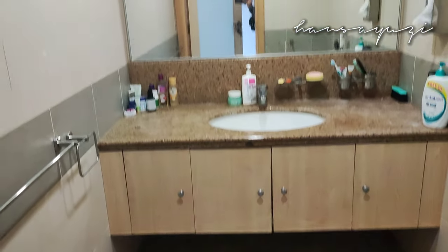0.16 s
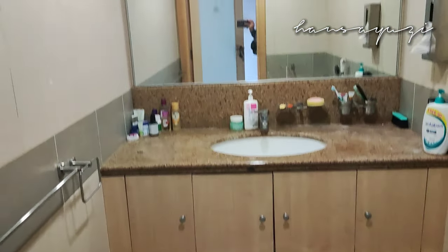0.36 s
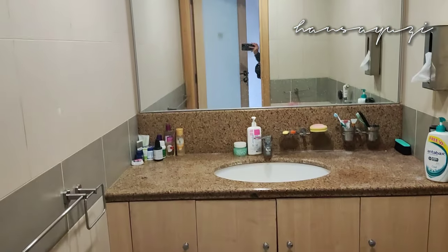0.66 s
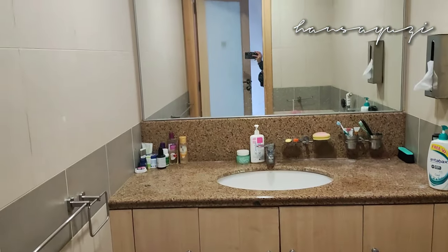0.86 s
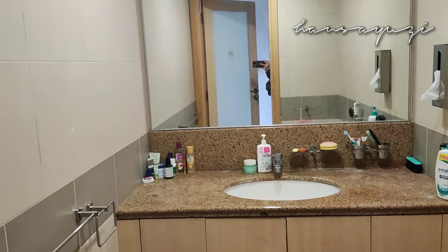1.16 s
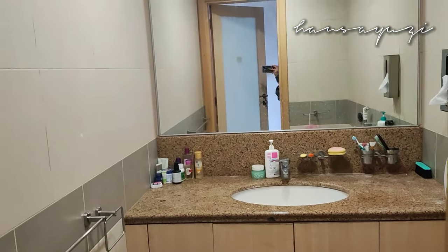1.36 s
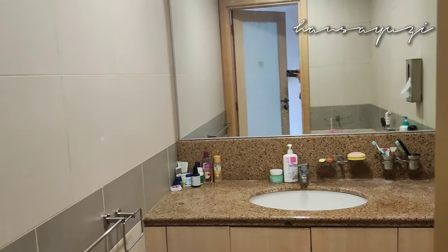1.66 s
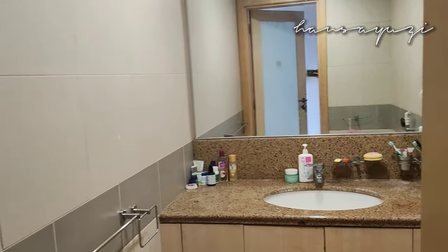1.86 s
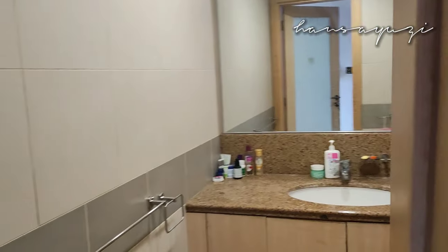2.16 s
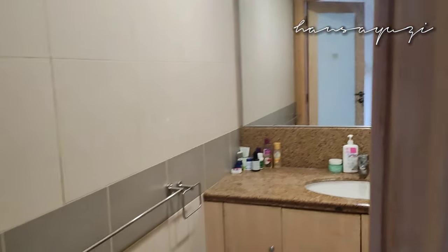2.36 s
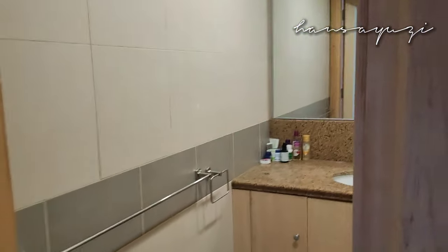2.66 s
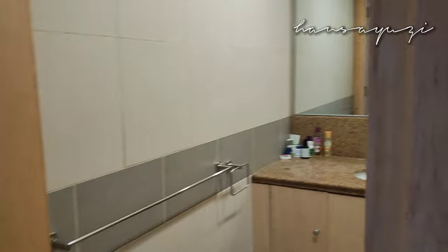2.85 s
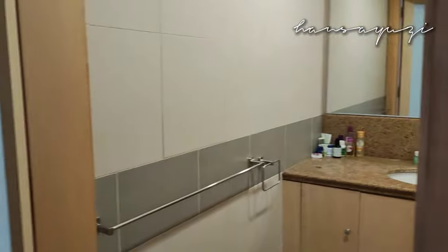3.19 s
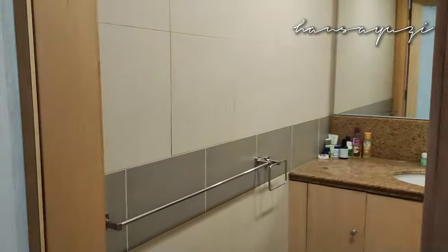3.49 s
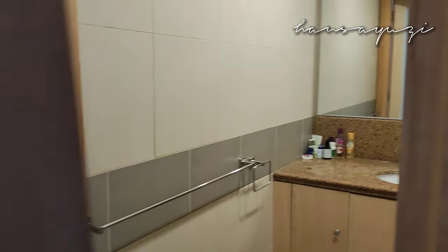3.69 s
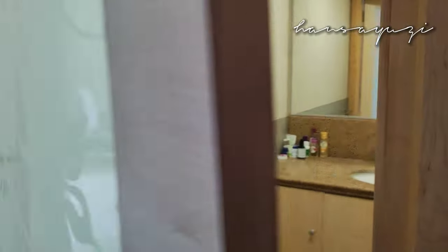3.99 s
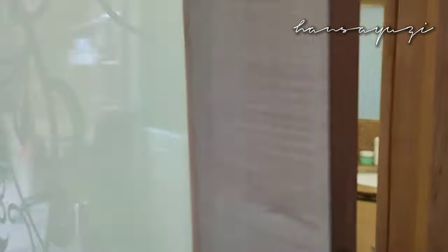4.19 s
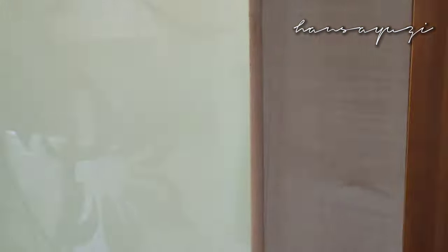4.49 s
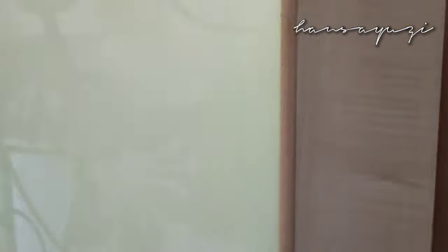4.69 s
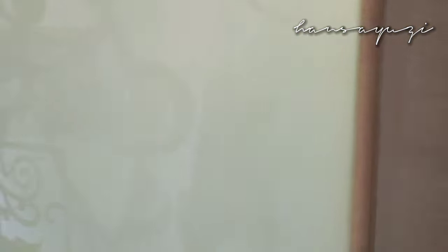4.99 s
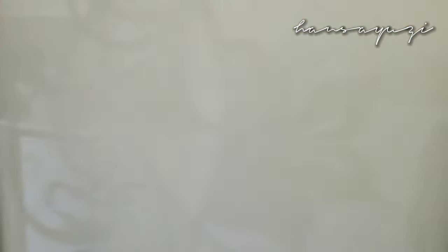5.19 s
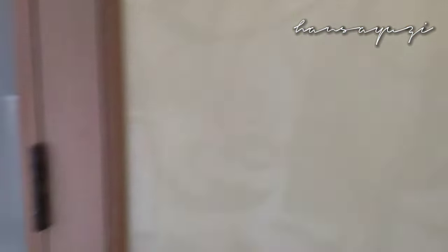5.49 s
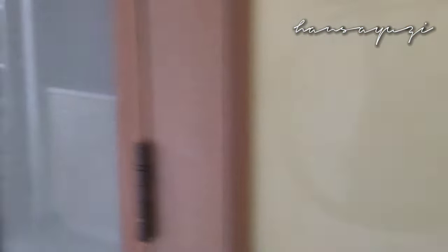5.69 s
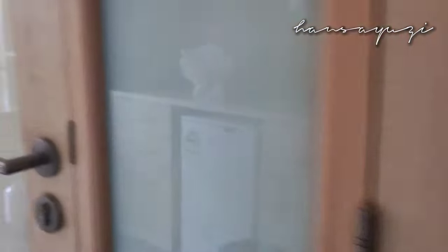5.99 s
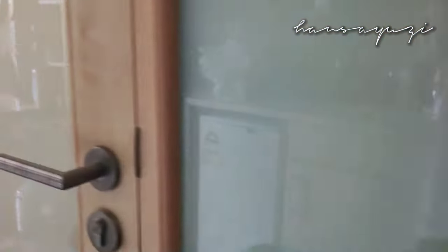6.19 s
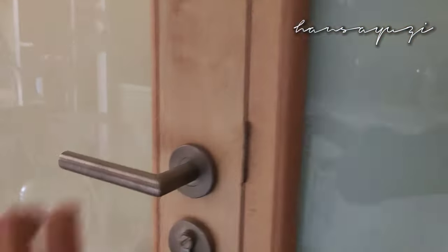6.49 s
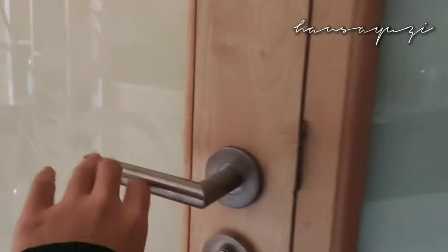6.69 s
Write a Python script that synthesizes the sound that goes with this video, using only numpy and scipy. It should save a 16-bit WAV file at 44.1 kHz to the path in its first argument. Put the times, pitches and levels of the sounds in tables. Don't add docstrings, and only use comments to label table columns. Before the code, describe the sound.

A quiet tiled bathroom heard through a handheld stereo phone. From 0 s there is low, slowly beating motor hum, soft rumble, faint hiss and a thin mid-pitched fan whine that swells and shifts sides. Cloth and slippers rustle very softly; a small sharp tick comes at 2.7 s, with more movement after it. Around 3.3 s a soft bump and a barely audible high metallic spring ring occur. Rustling grows from 4.2 s. At 4.76 s a latch snaps loudly with a woody knock; at 5.0 s the door slams, a rapid clatter of metal and hollow wood running to about 5.25 s, pane shuddering, deep air thumps beneath. A last small knock falls at 5.38 s. Hard walls ring on, fading by about 6 s. Soft footfalls, scuffs and short fabric rustles continue, with a light tap near 6.35 s, until 6.85 s.

```python
import sys
import numpy as np
from scipy import signal
from scipy.fft import rfft, irfft
from scipy.io import wavfile
from scipy.ndimage import uniform_filter1d

SR = 44100
rng = np.random.default_rng(int(sys.argv[2]) if len(sys.argv) > 2 else 0)


def volts_from_db(level):
    exponent = np.asarray(level, float) / 20
    return 10 ** exponent


def store_pcm(level_fs):
    pcm = np.round(np.clip(level_fs, -1, 1) * 32767).astype(np.int16)
    wavfile.write(sys.argv[1], SR, np.atleast_2d(pcm).T)


N = 302085
T = np.arange(N) / SR
BINS = np.maximum(np.fft.rfftfreq(N, 1 / SR), 1)


def unit(x):
    return x / np.sqrt(np.mean(x ** 2))


def along_hz(table, column=1):
    table = np.array(table, float)
    return np.interp(np.log(BINS), np.log(table[:, 0]), table[:, column])


def curves(table):
    s, *columns = np.transpose(table)
    return [np.interp(T, s, c) for c in columns]


def noise(colour):
    like = np.clip(along_hz(WALLS, column=2), 0, 1)
    mid, side = rfft(rng.standard_normal((2, N)))
    pair = np.sqrt(1 + like) * mid + np.sqrt(1 - like) * side * np.array([[1], [-1]])
    return unit(irfft(pair * volts_from_db(along_hz(colour)), N))


def narrow_noise(hz, width_hz):
    peak = 1 / (1 + ((BINS - hz) / (width_hz / 2)) ** 2)
    return unit(irfft(rfft(rng.standard_normal(N)) * peak, N))


def walk(rate_hz):
    k = int(SR / rate_hz)
    held = np.repeat(rng.standard_normal(N // k + 1), k)
    return 1.07 * uniform_filter1d(uniform_filter1d(held, k), k)[:N]


def pan(db):
    return volts_from_db(np.array([db, -db]) / 2)


def cut(x, hz, kind):
    return signal.sosfilt(signal.butter(2, hz, kind, fs=SR, output="sos"), x)


def port(x, peaks):
    for hz, width_hz, db in peaks:
        w, a = 2 * np.pi * hz / SR, volts_from_db(db / 2)
        d = np.sin(w) * width_hz / hz / 2
        zeros = [1 + d * a, -2 * np.cos(w), 1 - d * a]
        poles = [1 + d / a, -2 * np.cos(w), 1 - d / a]
        x = signal.lfilter(zeros, poles, x)
    return x


def contacts(events):
    crack, push = np.zeros((2, N)), np.zeros(N)
    for s, crack_db, push_db, ms, treble_db in events:
        i = int(s * SR)
        t = T[:min(N - i, SR // 4)]
        fade = np.exp(-t / (ms / 1000)) * np.clip(t / 0.0002, 0, 1)
        crack[:, i:i + len(fade)] += np.outer(volts_from_db(np.array([crack_db, crack_db + treble_db])), fade)
        push[i:i + len(fade)] += volts_from_db(push_db) * fade
    return crack, push


def swells(events, rise_db_s, fall_db_s):
    s, hold, *dbs = np.transpose(events)[:, :, None]
    t = T[::32]
    under_db = np.maximum(np.maximum((s - t) * rise_db_s, (t - s - hold) * fall_db_s), 0)
    return [np.interp(T, t, np.sqrt(np.sum(volts_from_db(2 * (db - under_db)), axis=0))) for db in dbs]


# start_s, metal_crack_db, wood_body_db, contact_ms, crack_treble_db
BLOWS = [(4.7606, -15, -28, 2.56, 12.5), (4.7629, -10.5, -11.5, 4.3, -3), (4.7662, -15, -26, 2, -15),
         (4.7845, -38, -20.5, 3, -4), (4.821, -38, -15.5, 6, -3), (4.987, -56, -24, 4.2, -14),
         (4.9928, -20.5, -36, 4.6, 0.5), (5.0064, -10, -46, 2.23, 9), (5.0086, -8.5, -19, 3, 8.5),
         (5.026, -15, -22.5, 2.3, -3), (5.040, -17, -20, 5.6, 8.5), (5.054, -18, -16.5, 4.1, 0),
         (5.083, -31, -18.5, 6.5, -8), (5.114, -23, -13.5, 5.1, -5), (5.134, -17.5, -17, 4.8, -3),
         (5.161, -26, -17.5, 4.6, 1), (5.188, -16.5, -18.5, 2.2, -2), (5.215, -23, -20, 1.1, -13),
         (5.2625, -23, -27.5, 3.1, -0.5), (5.3788, -29.5, -34.5, 2.6, -12)]
# start_s, hold_s, buzz_db, body_db
SHUDDER = [
    (5.012, 0.0043, -27.5, -30),
    (5.125, 0.069, -48, -30),
    (5.33, 0.17, -63, -45.5),
]
SHUDDER_RISE_DB_S, SHUDDER_FALL_DB_S = 510, 183
# pitch_hz, level_db, t60_s
LEAF = [(143.7, 3, 0.47), (155, 3, 0.51), (186.2, -2, 0.51), (209.3, 0, 0.94), (248, -1, 0.34),
        (289, -3, 0.39), (325.3, -1, 0.42), (386, -25, 0.86), (403, -13, 0.44), (460, -11, 0.35),
        (521, -11, 0.32), (582, -12.5, 0.48), (657, -4.5, 0.28), (809, -8.5, 0.31), (916, -16, .25),
        (1122, -10.5, 0.2), (2770, -9.5, 0.2), (3290, -25, 0.23)]
# pitch_hz, level_db (per Hz)
THUD = [(60, -21.5), (100, -36), (140, 12.5), (220, 9.5), (350, 5), (600, -0.5), (1200, -13), (3000, -22),
        (8000, -55)]


def door():
    crack, push = contacts(BLOWS)
    buzz, body = swells(SHUDDER, SHUDDER_RISE_DB_S, SHUDDER_FALL_DB_S)
    chatter = volts_from_db(1.8 * walk(120))
    rattle = volts_from_db(-24.5) * chatter * body * rng.standard_normal(N)
    force = np.diff(push, prepend=0).clip(0) + rattle
    t = T[:SR]
    ring = 0
    for hz, db, t60 in LEAF:
        ring = ring + volts_from_db(db) * np.sin(2 * np.pi * hz * t) * np.exp(-np.log(1000) * t / t60)
    modes = signal.fftconvolve(force, ring)[:N]
    thud = (push + body) * noise(THUD).mean(axis=0)
    return crack + chatter * buzz, volts_from_db(1.0) * thud, volts_from_db(-12) * modes


# pitch_hz, level_db (per Hz)
CRACK = [(300, -10), (700, 1), (1500, 1), (3500, -2), (6500, -9.5), (9000, -6.5), (11000, -20.5),
         (15000, -31), (16300, -34), (17000, -59)]
# pitch_hz, width_hz, level_db
LATCH = [(560, 58, 9), (657, 23, 4.5), (784, 235, 9), (1050, 61, -9.5), (1170, 72, 6.5), (1410, 130, -2.5),
         (2270, 230, 3), (2720, 240, 5), (3280, 100, -4.5), (3330, 160, 4.5), (4260, 230, 5)]
TREBLE_HZ, TREBLE_PAN_DB = 5340, 10


def latch(crack):
    metal = port(noise(CRACK), LATCH)
    metal = metal / np.sqrt(uniform_filter1d(metal ** 2, SR // 700))
    treble = cut(metal, TREBLE_HZ, "high") * pan(TREBLE_PAN_DB)[:, None]
    return crack[0] * cut(metal, TREBLE_HZ, "low") + crack[1] * treble


# pitch_hz, crest_s
AIR_MODES = [(13.5, 5.072), (23.7, 5.163), (44.2, 4.992)]
# start_s, hold_s, level_db
AIR = [
    [(5.03, 0.027, -23), (5.3, 0.55, -34.5)],
    [(4.7, 0.021, -25), (5.09, .04, -21), (5.165, .01, -16.5), (5.3, .01, -20), (5.5, 0.028, -29.5)],
    [(4.86, 0.05, -33), (4.99, 0.012, -20.5), (5.12, 0.0042, -20), (5.24, 0.0091, -28)],
]
AIR_RISE_DB_S, AIR_FALL_DB_S = [148, 305, 352], [58, 106, 172]


def air():
    breath = 0
    for (hz, crest_s), pushes, rise, fall in zip(AIR_MODES, AIR, AIR_RISE_DB_S, AIR_FALL_DB_S):
        breath = breath + np.sqrt(2) * swells(pushes, rise, fall)[0] * np.cos(2 * np.pi * hz * (T - crest_s))
    return breath


# pitch_hz, t60_s, likeness of the two ports (0-1)
WALLS = [(60, 1, 0.36), (134, 0.85, 0.92), (293, 0.7, 0.64), (640, 0.69, 0.53), (1280, 0.91, 0),
         (2600, 0.75, 0.03), (5200, 0.62, 0), (8700, 0.44, 0.12), (13000, 0.39, 0)]
WALLS_DB, WALLS_GAP_MS, WALLS_CRACK_DB = -1, 5.8, -5
EARLY_T60_S, EARLY_DB = 0.15, 7.5


def walls(crack, body):
    spectrum, t = rfft(noise([(20, 0), (20000, 0)])), T[:SR]
    centres = np.log([row[0] for row in WALLS])
    energy = uniform_filter1d(crack ** 2, SR // 400, origin=SR // 800 - 1)

    def linger(power, t60):
        return signal.lfilter([1 / (SR / 20)], [1, -np.exp(-2 * np.log(1000) / (t60 * SR))], power)

    early = volts_from_db(2 * EARLY_DB) * linger(energy, EARLY_T60_S)
    tail = hiss = 0
    for k, (hz, t60, _) in enumerate(WALLS):
        share = np.interp(np.log(BINS), centres, np.arange(len(WALLS)) == k)
        band = irfft(spectrum * share, N)
        tail = tail + band[:, :SR] * np.exp(-np.log(1000) * t / t60)
        part = int(hz > TREBLE_HZ)
        hiss = hiss + band * np.sqrt(np.abs(early[part] + linger(energy[part], t60)))
    tail = tail * np.clip(t / (WALLS_GAP_MS / 1000), 0, 1) ** 2
    tail = tail / np.sqrt(np.sum(tail ** 2) / 2)
    colour = volts_from_db(along_hz(CRACK))
    hiss = irfft(rfft(hiss) * colour / np.sqrt(np.mean(colour ** 2)), N)
    hiss = port(hiss, LATCH) * volts_from_db(0.97 * walk(260))
    dense = signal.fftconvolve(body[None], tail, axes=1)[:, :N]
    return volts_from_db(WALLS_DB) * dense + volts_from_db(WALLS_CRACK_DB) * hiss * pan(1.8)[:, None]


# start_s, tick_db, thud_db, contact_ms, tick_treble_db
STEPS = [(.2, -77, -52.5, 33, 0), (.66, -60, -50.5, 30, 3), (1.9107, -71, -48, 3.2, -5),
         (2.7127, -35.5, -60, 1.1, 4), (3.3404, -50, -50, 7.7, 3), (3.36, -60, -41, 20, -8),
         (4.5317, -42.5, -44, 4.9, -10), (4.663, -75, -43.5, 36, -8), (4.71, -72, -46, 22, -8),
         (5.86, -50, -48.5, 7.1, 3), (6.3491, -45, -37.5, 5.4, -6)]


def steps():
    tick, thud = contacts(STEPS)
    return tick, thud * noise(THUD).mean(axis=0)


# start_s, hold_s, cloth_db, slipper_db
MOVES = [(0, 0.56, -67.5, -68), (.55, 0.12, -61, -72), (1.93, 0.69, -65.5, -70.5), (2.65, 0.26, -51.5, -58),
         (3.1, 0.092, -52.5, -59), (3.345, 0.093, -56, -52), (3.47, 0.13, -56, -63.5),
         (3.7, 0.18, -58.5, -61), (3.95, 0.15, -58.5, -59.5), (4.2, 0.21, -54.5, -62),
         (4.48, 0.24, -50.5, -57), (5.4, 0.18, -48, -69), (5.65, 0.12, -55, -56), (5.87, 0.039, -49, -48.5),
         (6.1, 0.045, -65, -59), (6.25, 0.041, -49.5, -55.5), (6.37, 0.016, -53.5, -52),
         (6.47, 0.064, -47, -55), (6.58, 0.07, -51, -58), (6.7, 0.05, -46.5, -55)]
MOVE_RISE_DB_S, MOVE_FALL_DB_S, REST_DB = 78, 100, -74.5
SCUFF_RISE_DB_S, SCUFF_FALL_DB_S, SCUFF_REST_DB = 300, 87, -74
# pitch_hz, level_db (per Hz)
CLOTH = [(500, -4.5), (1200, -1.5), (2500, 1), (4500, -5), (7000, -11.5), (10000, -9.5), (13000, -21.5),
         (15500, -14)]
# pitch_hz, level_db (per Hz)
SCUFF = [(150, -11), (350, -1), (800, -2.5), (1400, -9), (3000, -31)]


def rustle():
    cloth = swells(MOVES, MOVE_RISE_DB_S, MOVE_FALL_DB_S)[0] + volts_from_db(REST_DB)
    scuff = swells(MOVES, SCUFF_RISE_DB_S, SCUFF_FALL_DB_S)[1] + volts_from_db(SCUFF_REST_DB)
    grains = unit(volts_from_db(0.94 * walk(600) + 1.1 * walk(30)))
    return volts_from_db(-3) * cloth * grains * noise(CLOTH) + scuff * volts_from_db(0.79 * walk(30)) * noise(SCUFF)


# start_s, hold_s, level_db
SPRING = [
    (3.24, .04, -71),
    (3.34, .01, -64),
    (3.44, .05, -71),
]
SPRING_HZ, SPRING_WIDTH_HZ = 3030, 150


def spring():
    return swells(SPRING, 300, 200)[0] * narrow_noise(SPRING_HZ, SPRING_WIDTH_HZ)


# time_s, walked_m
PATH = [
    (0, 0),
    (2.2, .5),
    (3.2, 1.0),
    (4.5, 1.85),
    (5.7, 4.5),
    (6.85, 1.5),
]


def standing(hz, db, node_m, node_db):
    metres = curves(PATH)[0] - node_m
    return volts_from_db(db) * np.hypot(np.sin(2 * np.pi * hz * metres / 343), volts_from_db(node_db))


HUM_HZ = [27.12, 36.15, 54.21, 58.21]
# level_db, node_m, left_in_node_db
HUM = [(-40.5, 0.57, -22), (-67, -0.23, -9), (-48, -0.32, -4.5), (-53.5, 0.22, -7)]
HUM_CREST_S = 0.036
# time_s, level_db, left_minus_right_db
WHINE = [(0, -62, 13), (.35, -55.5, 7), (1.5, -54.5, 8), (1.95, -58.5, 11), (2.3, -66.5, 10),
         (2.8, -67, 21), (3.3, -67, 23), (3.7, -64.5, 17), (4.0, -59.5, 5.5), (4.3, -52.5, 0),
         (4.75, -59.5, 4), (5.4, -63, 18), (5.6, -56.5, 17), (5.95, -50.5, -4), (6.15, -61, -14),
         (6.5, -58, 0), (6.85, -54.5, 5)]
WHINE_HZ = 523.7
# pitch_hz, width_hz, level_db, left_minus_right_db
TONES = [(456.5, 4.8, -71.5, -11.5), (209, 17.5, -64.5, -9.5), (3380, 37, -96, -2), (3470, 22, -84.5, -10)]


def motors():
    hum = 0
    for hz, wave in zip(HUM_HZ, HUM):
        gain = standing(hz, *wave) * volts_from_db(1.5 * walk(2.67))
        hum = hum + gain * np.cos(2 * np.pi * hz * (T - HUM_CREST_S))
    db, pan_db = curves(WHINE)
    phase = 2 * np.pi * WHINE_HZ * T + 0.28 * walk(2.17)
    whine = volts_from_db(db + 0.7 * walk(4.0)) * pan(pan_db) * np.sin(phase)
    tones = 0
    for hz, width_hz, tone_db, side_db in TONES:
        tones = tones + volts_from_db(tone_db) * np.outer(pan(side_db), narrow_noise(hz, width_hz))
    return np.sqrt(2) * (hum + whine) + tones


# pitch_hz, level_db (per Hz)
HOUSE = [(20, -5), (45, 0.5), (90, -3.5), (150, -7), (250, -9.5), (400, -19.5), (800, -22), (1500, -29.5),
         (3500, -35.5), (6500, -44), (13000, -46), (14500, -38), (15600, -33)]
HOUSE_DB = -49.5
RUMBLE_DB, RUMBLE_SHUT_DB, SHUT_S = 1.5, 2.5, 4.1


def house():
    hiss = noise(HOUSE)
    rumble_db = RUMBLE_DB + RUMBLE_SHUT_DB * (T > SHUT_S)
    lumps = volts_from_db(rumble_db + 1.5 * walk(7)) - 1
    return volts_from_db(HOUSE_DB) * (hiss + lumps * cut(hiss, 320, "low"))


def scene():
    crack, thud, modes = door()
    tick, fall = steps()
    crack = crack + tick
    body = cut(cut(thud + fall, 93, "high"), 82, "high")
    near = latch(crack) + (body + modes) * pan(2.1)[:, None]
    echoes = walls(crack, body + 0.32 * modes)
    return near + echoes + air() * pan(1.0)[:, None] + rustle() + spring() + motors() + house()


def top_cut(x):
    return signal.sosfilt(signal.butter(12, 16490, fs=SR, output="sos"), x)


# pitch_hz, width_hz, level_db
LEFT_PORT = [(8100, 1350, -20), (6600, 1700, 4), (14500, 2700, -0.5)]
# pitch_hz, width_hz, level_db
RIGHT_PORT = [(2780, 2100, 5.7), (8676, 2100, 12.2), (11910, 1300, 11.4)]
TOP_HZ = 15550


def record(dry):
    x = np.array([port(dry[0], LEFT_PORT), port(dry[1], RIGHT_PORT)])
    rounded = np.tanh(0.7 * x) / 0.7
    top = signal.ellip(6, 0.5, 32, TOP_HZ, fs=SR, output="sos")
    return top_cut(signal.sosfilt(top, rounded))


dry = scene()
out = record(dry)
store_pcm(out)
```